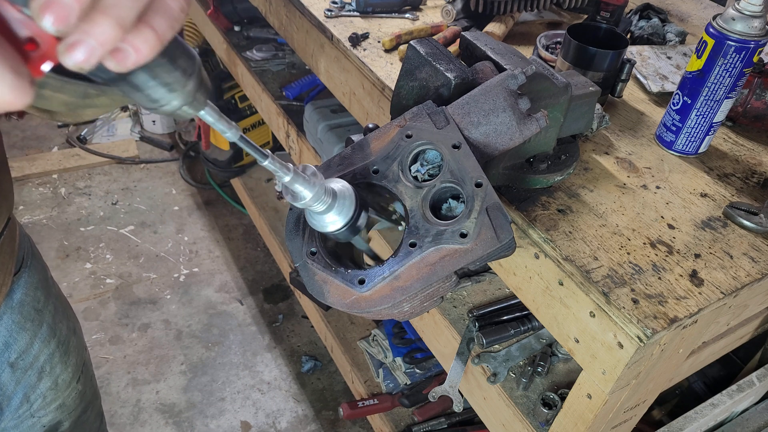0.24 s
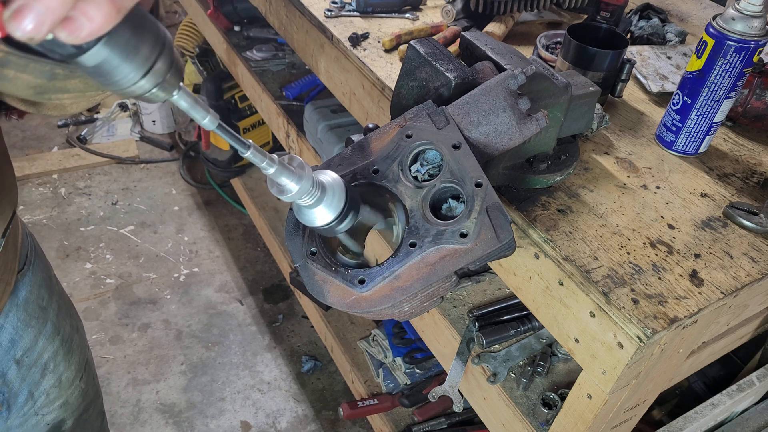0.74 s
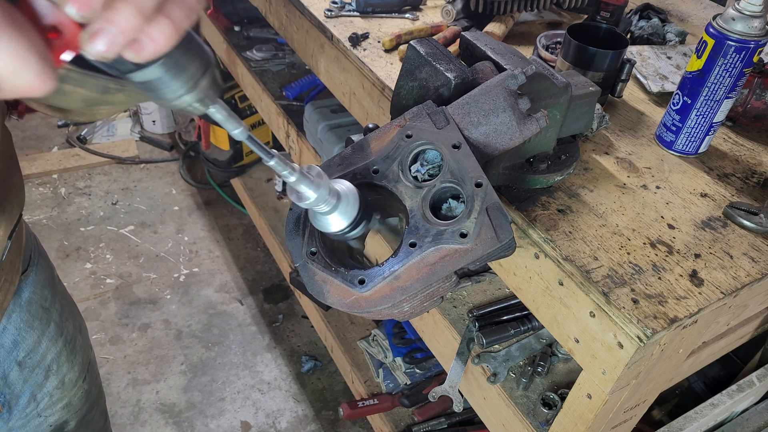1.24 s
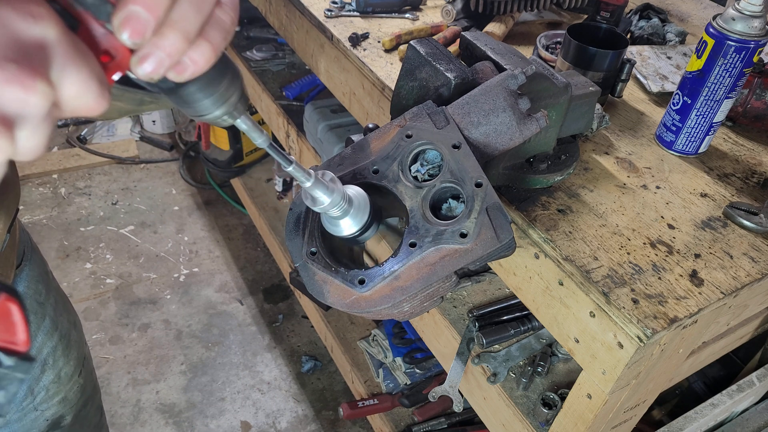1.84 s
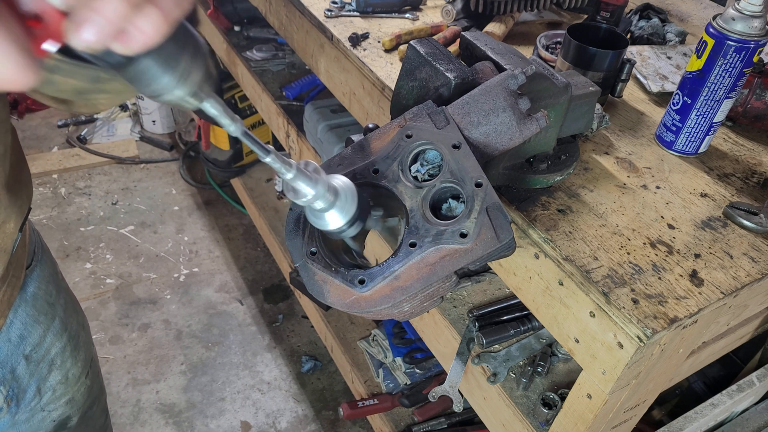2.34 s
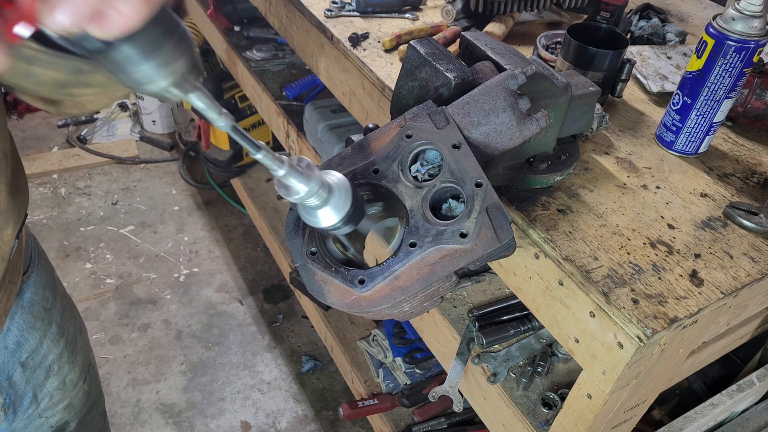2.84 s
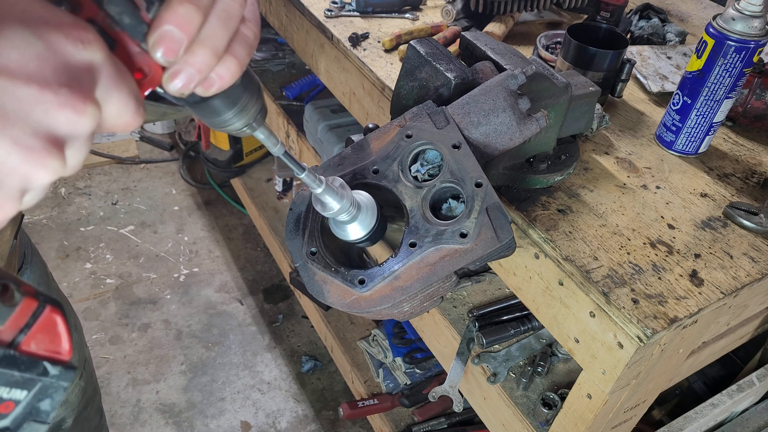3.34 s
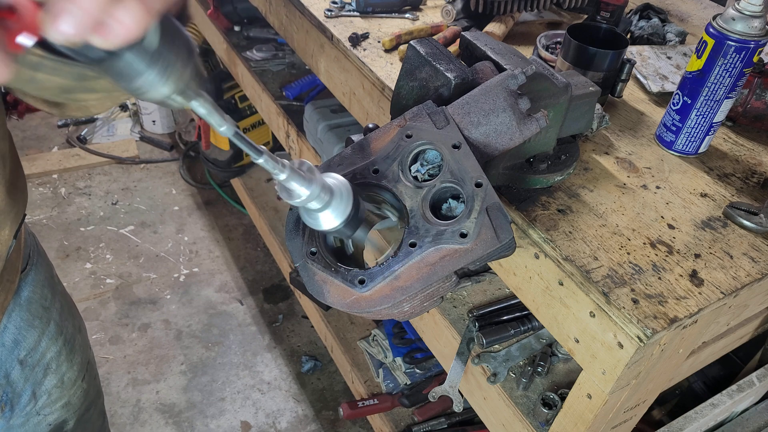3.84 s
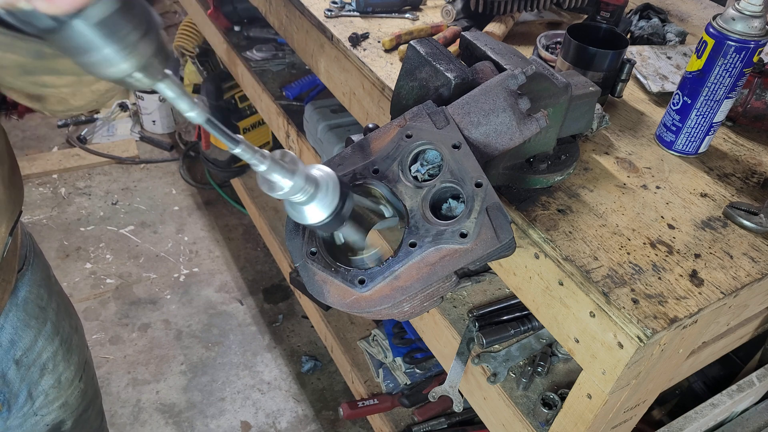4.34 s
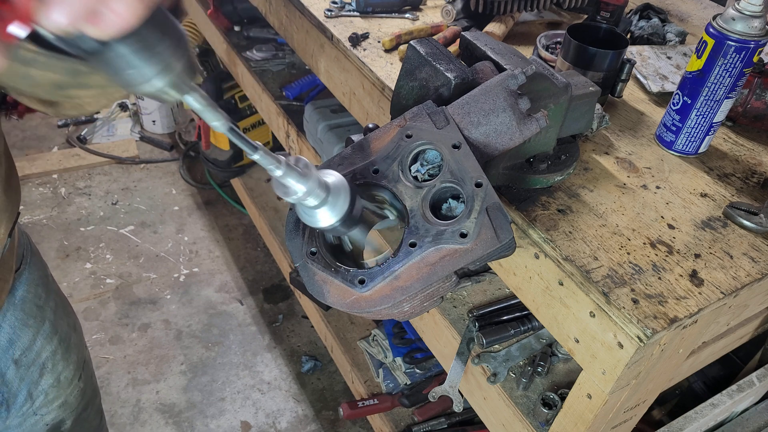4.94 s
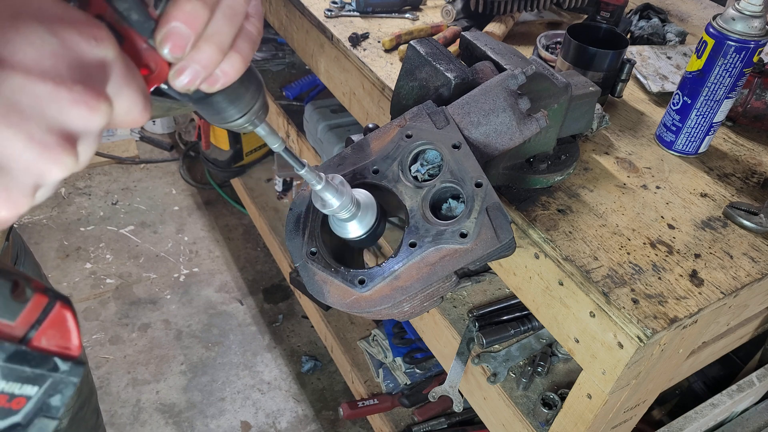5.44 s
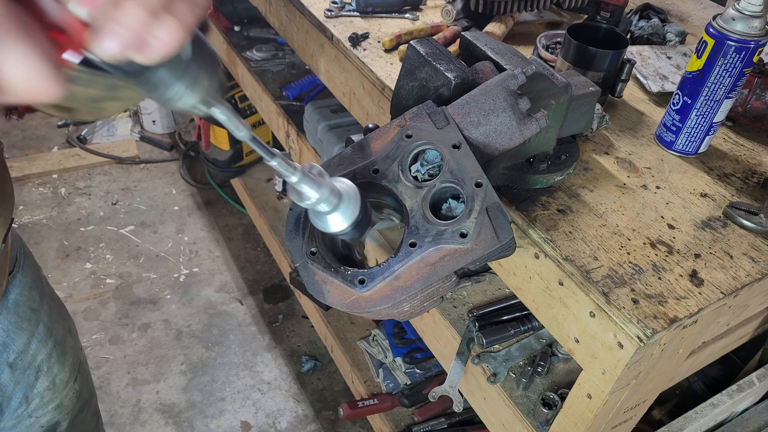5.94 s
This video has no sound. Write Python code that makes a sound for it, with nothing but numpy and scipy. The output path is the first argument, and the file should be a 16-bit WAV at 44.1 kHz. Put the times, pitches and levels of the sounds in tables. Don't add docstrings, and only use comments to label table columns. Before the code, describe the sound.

A stereo phone microphone at arm's length hears a hand drill already turning slowly, then winding up rapidly to full speed. A piercing trigger whistle fades as the whine rises. Afterwards the motor runs steadily to the end, layered with buzzy gear tones and scratchy abrasive hiss, brighter on the left. Every stroke of the hone shifts its colour slightly, over faint workshop rumble and hum.

```python
import sys
import numpy as np
from scipy import signal
from scipy.fft import rfft, irfft
from scipy.io import wavfile
from scipy.ndimage import map_coordinates

SR = 44100
rng = np.random.default_rng(int(sys.argv[2]) if len(sys.argv) > 2 else 0)


def to_linear_factor(level_db):
    exponent = np.asarray(level_db, float) / 20
    return 10 ** exponent


def unload_audio(sound):
    columns = np.transpose(np.atleast_2d(sound))
    steps = np.round(np.clip(columns, -1, 1) * 32767)
    wavfile.write(sys.argv[1], SR, steps.astype(np.int16))


N = 272097
TIME = np.arange(N) / SR
FREQ = np.maximum(np.arange(N // 2 + 1) * SR / N, 1)
FULL_HZ = 365.3
STEP = 32


def curves(table):
    s, *columns = np.transpose(table)
    return [np.interp(TIME, s, column) for column in columns]


def across(table):
    hz, value = np.transpose(table)
    return np.interp(np.log(FREQ), np.log(np.maximum(hz, 1)), value)


def walk(rate, size=1):
    points = rng.standard_normal(200)
    return 1.2 * np.interp(TIME[::size] * rate, np.arange(200), points)


def noise_pair(share):
    common, own = rfft(rng.standard_normal((2, N)))
    share = np.clip(share, 0, 1)
    return np.array([common, share * common + np.sqrt(1 - share ** 2) * own])


def shop():
    # frequency in Hz, level in dB per Hz.
    rumble_colour = [(12, -37), (20, 8.5), (65, 4), (83, 4.5), (157, -4.5), (222, -9), (370, -9), (492, -3),
                     (600, -9), (780, -36), (1320, -120)]
    rumble = irfft(noise_pair(0.45) * to_linear_factor(across(rumble_colour)) * (FREQ < 700), N)
    rumble = to_linear_factor(-74) * to_linear_factor(1.7 * walk(7)) * rumble / np.std(rumble)
    hum = to_linear_factor(-73.5 + 2.2 * walk(6)) * np.sin(2 * np.pi * 60.3 * TIME)
    return (rumble + hum) * to_linear_factor([[-1.5], [1.5]])


def strokes():
    # time in seconds, place of the drill (1 drawn back, -1 pushed in).
    turning_points = [(.83, -.1), (1.13, -.8), (1.56, 1.05), (1.88, -.65), (2.2, 1), (2.64, -1.1),
                      (3.03, .9), (3.42, -1), (3.77, .95), (4.12, -.95), (4.44, 1.05), (4.79, -.95),
                      (5.12, 1.05), (5.48, -1), (5.84, 1.05), (6.22, -.7)]
    drag_late_s = .055
    s, place = np.transpose(turning_points)
    index = np.arange(len(s))
    count = np.interp(TIME, s, index)
    eased = np.floor(count) + .5 - .5 * np.cos(np.pi * (count % 1))
    late = np.interp(TIME - drag_late_s, s, index)
    return np.interp(eased, index, place), np.cos(np.pi * late) ** 2


def rotor(load):
    # time in seconds, rotor speed in Hz; after the last the rotor settles by itself.
    run_up = [(0, 66.2), (.09, 79.5), (.28, 102.4), (.33, 110.4), (.37, 124.1), (.42, 148.7), (.45, 169.4),
              (.5, 192), (.6, 222.3), (.65, 239.8), (.68, 261.7), (.7, 289.5), (.74, 325.9)]
    free_hz, settle_s = 366.7, .087
    bite_s, bite_hz, drag_hz = 1.47, .9, 1.0
    hz, = curves(run_up)
    since = np.maximum(TIME - run_up[-1][0], 0)
    settling = (free_hz - hz) * (1 - np.exp(-since / settle_s))
    bite = np.clip((TIME - bite_s) / .1 + .5, 0, 1)
    return hz + settling - bite * (bite_hz + drag_hz * load + .2 * walk(5))


def chopper(hz, turn):
    # time in seconds, whistle level in dB.
    whistle = [
        (0, -43),
        (0.25, -43),
        (0.28, -55),
        (0.31, -49),
        (0.4, -58),
        (0.55, -61),
        (0.62, -55),
        (0.68, -55),
        (0.72, -75),
    ]
    # rotor order below the whistle, level in dB relative to it.
    sidebands = [(2, -20), (4, -18), (6, -18), (8, -15), (10, -13)]
    level_db, = curves(whistle)
    carrier = 2 * np.pi * 15487 * TIME
    sides = sum(to_linear_factor(db + 3.3 * walk(12)) * np.sin(carrier - k * turn) for k, db in sidebands)
    tone = np.sin(carrier) + sides * np.clip(2.2 - hz / 110, 0, 1)
    return tone * to_linear_factor(level_db + 9) * to_linear_factor([[0], [-11]])


def hiss(turn):
    # frequency in Hz, share of the noise common to both ports.
    alike = [(100, 0.91), (700, 0.6), (1500, 0.6), (3000, 0.53), (6000, 0.033), (15000, 0.19)]
    chop = 1 + .07 * np.sin(turn) + .04 * np.sin(turn / 4)
    return irfft(noise_pair(across(alike)), N) * chop * to_linear_factor(0.38 * walk(24))


def rotor_orders(down):
    # rotor order, left and right level in dB over the hiss at full speed.
    strong = [(1, 22, 22), (2, 35, 31), (3, 22, 21), (4, 29, 27), (5, 21, 19), (6, 20, 17), (8, 21, 16),
              (13, 20, 17), (14, 17, 20), (16, 21, 14), (17, 18, 14), (18, 26, 23), (19, 16, 19),
              (20, 27, 28), (21, 18, 21), (22, 14, 25), (23, 15, 23), (24, 21, 23), (25, 21, 20),
              (26, 19, 20), (27, 21, 19), (28, 27, 27), (29, 15, 21), (32, 24, 18), (33, 22, 15),
              (34, 25, 19), (36, 24, 18), (38, 20, 18), (42, 24, 15), (43, 22, 20)]
    faint = (7, 9, 11, 12, 31, 35, 37, 39, 41)
    faint_db = (16, 14)
    levels = list(strong) + [(k, *faint_db) for k in faint]
    return [(k, left, right, -(4.5 if k == 2 else 14) * down) for k, left, right in levels]


def gear_orders(down):
    # rotor order, left and right level in dB, dB gained on the way up,
    # octaves below full speed where it blooms.
    mesh = [(2.8125, 12, 10, 15, .75), (5.625, 14, 11, 0, 1), (8.4375, 16, 13, -3, 2.1),
            (22.5, 8, 10, 16, 1.9), (28.125, 6, 6, 19, 2.1), (33.75, 6, 6, 23, 1.9), (45, 10, 10, 10, 2)]
    return [(k, left, right, db * np.exp(-((down - at) / .6) ** 2)) for k, left, right, db, at in mesh]


def loud_whines(hz, down):
    resonant = {10: (25, 23.4, 4.9, 2157, 23.5), 11.25: (23.3, 16.4, 4.5, 3660, 2.6),
                15: (33.3, 30.6, 13, 4750, 4), 30: (36, 31.8, 15, 4800, 19), 40: (25.3, 24, 5.5, 13570, 10)}
    played = {}
    for k, (left, right, lost, at_hz, gained) in resonant.items():
        half_width_hz = 220 + .04 * at_hz
        bloom = np.exp(-((k * hz - at_hz) / half_width_hz) ** 2)
        played[k] = np.array([[left], [right]]) - lost * down + gained * bloom
    return played


def slot_overtones(slot_db, down):
    # rotor order, dB over half the slot order's dB level.
    overtones = [(50, 16), (60, 6), (70, 6)]
    slow = np.where(down > .35, 0, -60)
    return [(k, slot_db / 2 + db, slot_db / 2 + db, slow) for k, db in overtones]


def bench_echoes(down, place):
    reflections = [(30, 0, .6, .9, -.09), (30, 1, .3, 1.4, .3), (20, 0, .6, .48, 1.0),
                   (28, 0, .55, .75, .25), (15, 1, .62, 1.05, .85), (15, 0, .18, 1.35, -.45),
                   (40, 0, .25, .45, 1.0), (40, 1, .4, .45, -1.0), (10, 0, .45, .45, 1.1),
                   (11.25, 0, .5, .45, 1.1), (11.25, 1, .6, .8, -1.0), (8, 0, .4, .45, -1.0),
                   (8, 1, .4, .45, 1.0), (6, 0, .55, .7, .4)]
    near_full = np.clip(1 - 5 * down, 0, 1)
    return {(k, port): 1 + near_full * share * np.exp(1j * np.pi * fades * (place - at))
            for k, port, share, fades, at in reflections}


def whines(hz, turn, place, shade_db):
    turned = {15: .7, 11.25: 2.1}
    hz, place, shade_db = hz[::STEP], place[::STEP], shade_db[::STEP]
    down = np.log2(FULL_HZ / hz)
    played = loud_whines(hz, down)
    echo = bench_echoes(down, place)
    lines = rotor_orders(down) + gear_orders(down) + slot_overtones(played[10][0], down)
    lines += [(k, *played[k], 1) for k in played]
    out = np.zeros((2, N))
    for k, left, right, run_up_db in lines:
        short = min(k / 8, 1) ** 1.5
        for port, db in enumerate((left, right)):
            db = db + run_up_db
            if (k, port) in echo:
                flutter_db = 2.2 if 9 < k < 12 else 1.4
                db = db + 20 * np.log10(np.abs(echo[k, port])) - 1 + flutter_db * walk(14, size=STEP)
            else:
                db = db + short * (2.8 * walk(6, size=STEP) - 1)
                if k > 18 and port == 0:
                    db = db + shade_db
            drift = port * (.015 * k * walk(3, size=STEP) + turned.get(k, 0))
            drift = drift + np.angle(echo.get((k, port), 1))
            drift = drift + np.zeros(len(hz))
            phase = k * turn + k * k + np.repeat(drift, STEP)[:N]
            out[port] += np.repeat(to_linear_factor(db + 1), STEP)[:N] * np.sin(phase)
    return out * np.sqrt(4 / SR)


def reach(hz, place):
    # dB lost per octave below full speed,
    # dB per unit of place, dB of the first surge.
    shading = [(2, -0.02, 2), (4, 1.16, 2.5), (4.5, -1.2, 4)]
    surge_s, fade_s, unsteady_db = 0.624, 0.55, 0.33
    down = np.log2(FULL_HZ / hz)
    rise = np.clip((TIME - surge_s) / .06 + .5, 0, 1)
    surge = rise * np.exp(-np.maximum(TIME - surge_s, 0) / fade_s)
    return [-lost * down + swing * place + first * surge + unsteady_db * walk(8)
            for lost, swing, first in shading]


def port_colour():
    # frequency in Hz, level in dB per Hz.
    left_colour = [(170, -101), (240, -88.5), (400, -84.5), (700, -82.5), (1300, -80), (2200, -77),
                   (3700, -73), (5900, -73.5), (6400, -79), (7800, -74), (8500, -80), (10500, -73),
                   (11500, -70), (15700, -69)]
    right_colour = [(170, -113), (240, -87.5), (700, -83.5), (1300, -84), (2200, -78), (5800, -75.5),
                    (6500, -76.5), (7200, -104.5), (8200, -99), (9500, -104.5), (10300, -128),
                    (10800, -81.5), (13000, -82.5), (15700, -81.5)]
    # frequency in Hz, radians by which left leads.
    lead = [(0, 0), (730, 1.3), (1460, 3.9), (2760, 6.8), (16400, 40)]
    colour = to_linear_factor([across(left_colour), across(right_colour)]) * np.sqrt(SR / 2) / (1 + (150 / FREQ) ** 6)
    lag = np.exp(-1j * np.interp(FREQ, *np.transpose(lead)))
    return colour * np.array([np.ones(len(FREQ)), lag])


def scene():
    split_hz, right_top_db = 6600, 2.7
    swing_m = .0205
    place, load = strokes()
    hz = rotor(load)
    turn = 2 * np.pi * np.cumsum(hz) / SR
    body_db, left_top, right_top = reach(hz, place)
    source = hiss(turn) + whines(hz, turn, place, np.maximum(left_top, -3.5))
    drill = rfft(source) * port_colour()
    treble = 1 / (1 + (split_hz / FREQ) ** 12)
    body = irfft(drill * (1 - treble), N) * to_linear_factor(body_db)
    top = irfft(drill * treble, N) * to_linear_factor([left_top, right_top + right_top_db])
    heard = body + top
    arrival = (TIME - swing_m * place / 343) * SR
    heard[1] = map_coordinates(heard[1], [arrival], order=5, mode="mirror")
    return heard + chopper(hz, turn) + shop()


def top_cut(x):
    return signal.sosfilt(signal.butter(12, 16790, fs=SR, output="sos"), x)


def record(dry):
    mix = irfft(rfft(dry) * (FREQ < 15725) / (1 + (35 / FREQ) ** 2), N)
    return top_cut(mix)


dry = scene()
out = record(dry)
unload_audio(out)
```